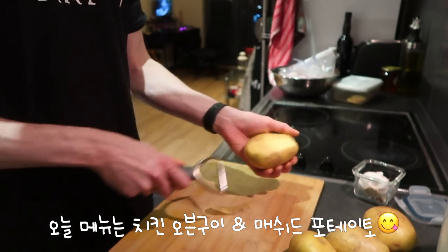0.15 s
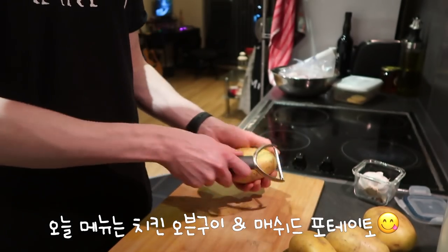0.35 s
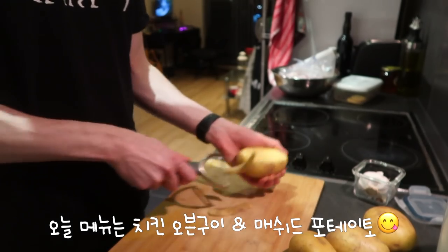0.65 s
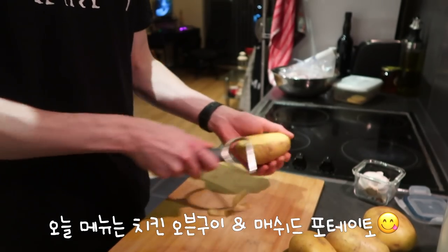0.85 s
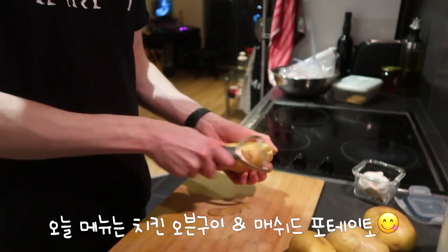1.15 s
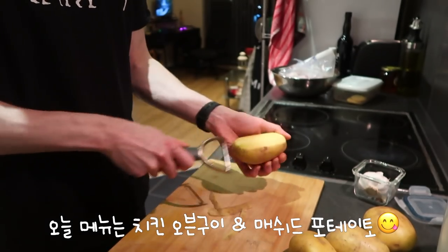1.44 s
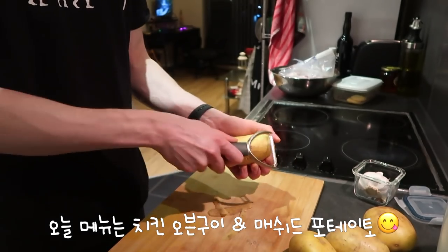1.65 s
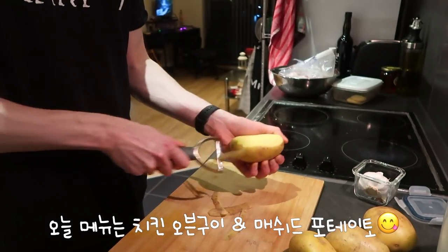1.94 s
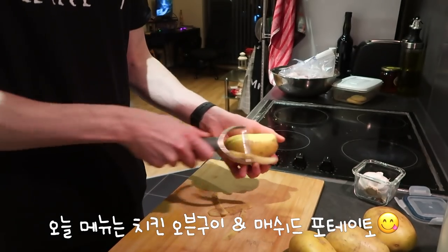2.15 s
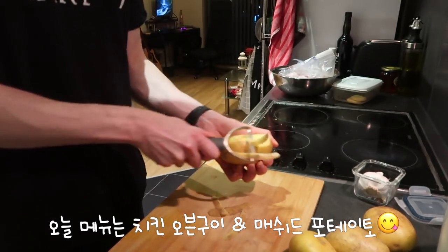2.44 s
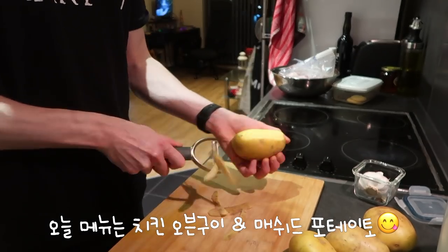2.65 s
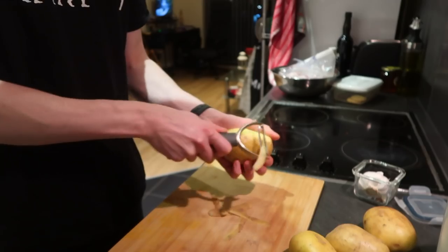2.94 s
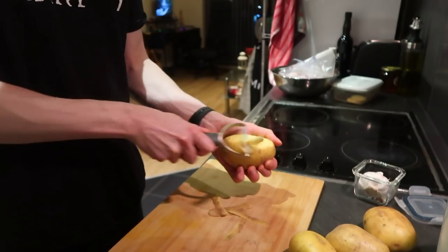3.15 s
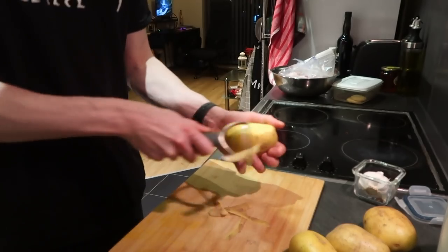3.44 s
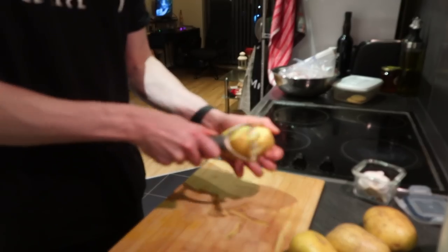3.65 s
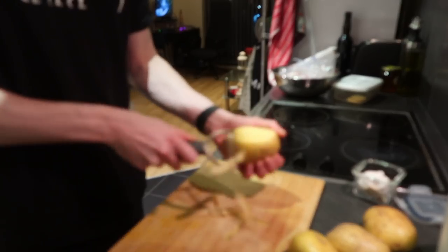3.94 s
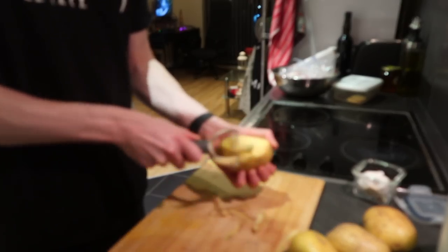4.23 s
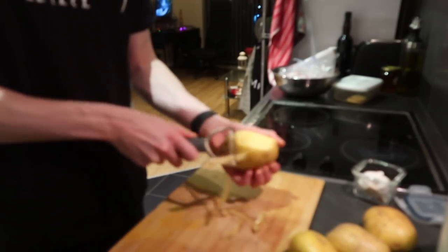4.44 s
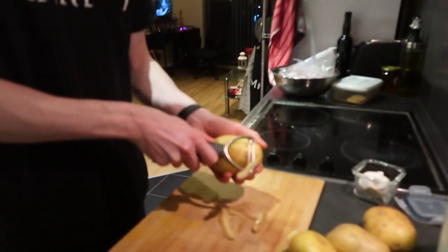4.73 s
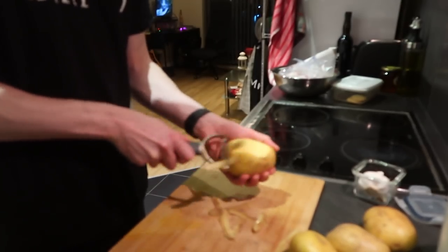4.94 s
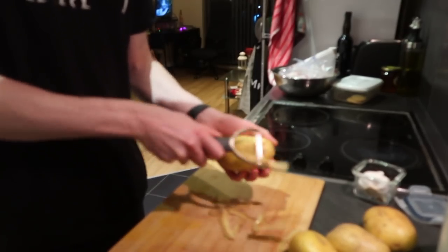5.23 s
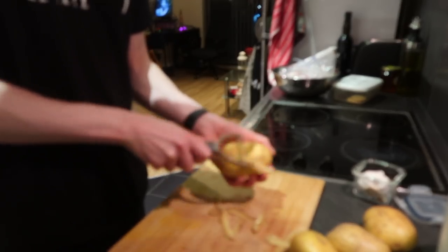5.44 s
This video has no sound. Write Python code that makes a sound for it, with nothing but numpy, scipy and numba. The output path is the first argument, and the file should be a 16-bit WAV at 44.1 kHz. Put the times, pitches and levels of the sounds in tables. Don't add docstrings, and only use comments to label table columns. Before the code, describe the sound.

Close wet scraping of a loose-bladed peeler, about two strokes a second, with one loud dull knock elsewhere and a steady fan rumble.

```python
import sys
import numpy as np
from scipy import signal
from scipy.fft import rfft, irfft, next_fast_len
from scipy.io import wavfile
from scipy.ndimage import uniform_filter1d
from numba import njit

SR = 44100
rng = np.random.default_rng(int(sys.argv[2]) if len(sys.argv) > 2 else 0)


def to_wav(sig):
    pcm = np.clip(np.atleast_2d(sig), -1, 1) * 32767
    pcm = np.round(pcm).astype(np.int16)
    wavfile.write(sys.argv[1], SR, pcm.T)


def invert_db(x):
    u = np.asarray(x, float) / 20
    return 10 ** u


N = 246116


def rms_one(x):
    return x / np.sqrt(np.mean(x ** 2) + 1e-20)


def at_hz(points, hz):
    table_hz, value = np.transpose(points)
    return np.interp(np.log(hz), np.log(table_hz), value)


def coloured(x, points):
    size = next_fast_len(x.shape[-1])
    hz = np.maximum(np.fft.rfftfreq(size, 1 / SR), 1)
    return irfft(rfft(x, size) * invert_db(at_hz(points, hz)), size)[..., :x.shape[-1]]


def band(x, low_hz, high_hz):
    sos = signal.butter(2, [low_hz, min(high_hz, .45 * SR)], "band", fs=SR, output="sos")
    return signal.sosfilt(sos, x)


def drift(rate_hz):
    knots = rng.standard_normal(int(N / SR * 200) + 2)
    return np.interp(np.arange(N) / SR * min(rate_hz, 199), np.arange(len(knots)), knots)


def ring(x, hz, t60_s):
    r = invert_db(-60 / (t60_s * SR))
    w = 2 * np.pi * hz / SR
    return signal.lfilter([0, np.sin(w)], [1, -2 * r * np.cos(w), r * r], x + 1e-18)


def rattle(start_s, lasts_s, modes):
    since_s = np.arange(N) / SR - start_s
    shake = (since_s > .004) * np.exp(-np.maximum(since_s, 0) / lasts_s)
    push = rng.standard_normal((2, N)) * shake
    return sum(invert_db(db - 56) * ring(push, hz, min(t60_s / 2, .4)) for hz, db, t60_s in modes)


@njit
def moving_resonance(x, hz, r, sr):
    out = np.zeros_like(x)
    for c in range(x.shape[0]):
        for i in range(2, x.shape[1]):
            feedback = 2 * r * np.cos(2 * np.pi * hz[i] / sr) * out[c, i - 1]
            out[c, i] = x[c, i] + feedback - r * r * out[c, i - 2]
    return out


def dying_noise(colour, rise_ms, hold_ms, scale, crack_db):
    # freq_hz, t60_s
    room_t60 = [(200, 0.84), (500, 0.66), (800, 0.44), (1250, 0.67), (2000, 0.73), (3300, 0.49),
                (5500, 0.64), (11000, 0.33)]
    t = np.arange(int(1.05 * SR)) / SR
    out = 0
    noise = rms_one(coloured(rng.standard_normal((2, len(t))), colour))
    edges_hz = 125 * 2 ** np.arange(0, 7.1, .4)
    for k, (low, high) in enumerate(zip(edges_hz, edges_hz[1:])):
        t60_s = scale * at_hz(room_t60, np.sqrt(low * high))
        direct = invert_db(crack_db) * np.exp(-t * low / 14)
        diffuse = invert_db(-60 * np.maximum(t - hold_ms / 1000, 0) / t60_s)
        out = out + (-1) ** k * band(noise, low, high) * (diffuse + direct)
    return out * np.minimum(t * 1000 / rise_ms, 1) ** 2


def fan():
    # freq_hz, density_db
    air_colour = [(15, -39), (25, -9.5), (32, -11), (40, -3.5), (88, 0.5), (121, -0.5), (154, -5.5),
                  (202, -11.5), (237, -21.5), (264, -16.5), (373, -14), (404, -16), (438, -16.5),
                  (475, -23.5), (1420, -32), (2500, -31.5), (8500, -50), (15000, -65.5)]
    # freq_hz, density_db
    side_colour = [(35, -65), (60, -41), (190, -8.5), (339, -4), (381, -6.5), (762, -13.5), (982, -14),
                   (4110, -19.5), (8820, -30), (10400, -27), (15000, -58)]
    # freq_hz, width_hz, level_db
    hums = [(154.2, 5.6, -42), (204.2, 9, -50), (271.3, 1.53, -52.5), (351, 15, -57.5), (1820, 160, -62.5),
            (2050, 110, -64)]
    air_db, side_db, hum_waver_db = -38, -55.5, 3.5
    air = invert_db(air_db) * rms_one(coloured(rng.standard_normal(N), air_colour))
    for hz, width_hz, db in hums:
        level = invert_db(db + hum_waver_db * drift(4.1) * np.log10(hz / 100))
        t60_s = np.log(1000) / np.pi / width_hz
        air += level * rms_one(ring(rng.standard_normal(N), hz, t60_s))
    side = invert_db(side_db) * rms_one(coloured(rng.standard_normal(N), side_colour))
    return np.array([air, side])


def knocks():
    # start_s, level_db, hold_ms, decay_scale, crack_db
    blows = [
        (0.581, -27.5, 3, 0.6, 4),
        (1.978, -39, 45, 0.91, -6),
        (2.342, -7.5, 47, 0.95, -6),
        (2.888, -46, 20, 0.99, 3),
        (3.239, -40.5, 21, 0.27, -10),
        (4.584, -27.5, 31, 1.14, -35),
    ]
    # freq_hz, density_db
    colours = [
        [(150, -31), (300, -9.5), (432, 4), (560, -12), (690, -0.5), (900, -8), (1090, 5), (1300, -5),
         (2300, -3), (3600, -9), (5200, -61)],
        [(240, -39), (400, -3.5), (549, -23), (672, 3.5), (774, -6), (2000, -11), (2600, -43), (4400, -120)],
        [(90, -49), (170, -15.5), (250, -25), (300, -19), (340, -16), (615, -9.5), (680, -8), (1010, -0.5),
         (1350, -4), (2100, -6), (2800, -14), (3600, -22.5), (7300, -44.5), (15000, -70)],
        [(290, -38), (500, -13), (941, -2), (1500, -14), (2000, -1.5), (2600, -36), (4400, -120)],
        [(240, -44), (400, -11), (638, -4), (980, -18), (1490, -6.5), (1700, -4), (2210, -33), (3740, -120)],
        [(240, -45), (400, -19), (520, -15.5), (620, -13.5), (995, -2), (1360, -4.5), (1680, -13.5),
         (2180, -17.5), (2800, -25), (3480, -19), (4200, -20), (9000, -35.5), (15000, -53)],
    ]
    # freq_hz, level_db, t60_s
    board = [(450, 12, .2), (704, 4, .15), (780, 2, 0.17), (1120, 6, 0.19), (1500, 7, .1), (2370, 3, .06)]
    panel = [(295.6, 7.5, 0.55), (684, 5, 0.33), (970, -5, 0.28), (995, 6.5, 0.43), (1084, -3, 0.23),
             (1350, 10, 1), (1610, -5, .4), (2100, 5.5, .5), (1940, -5, 0.48)]
    hollow = [(1140, -25, 0.16), (1232, -17, 0.16), (1385, -23, .12), (3250, -19, 0.043),
              (3480, -15.5, 0.08)]
    rise_per_hold, longest_rise_ms = 0.21, 8.9
    out = np.zeros((2, N))
    for (s, db, hold_ms, *decay), colour in zip(blows, colours):
        blow = dying_noise(colour, min(rise_per_hold * hold_ms, longest_rise_ms), hold_ms, *decay)
        at = round(s * SR)
        out[:, at:at + blow.shape[1]] += invert_db(db) * blow[:, :N - at]
    out = out + rattle(blows[2][0], 0.11, panel) + rattle(blows[0][0], 0.028, board)
    return out + invert_db(14) * rattle(blows[5][0], 0.14, hollow)


def kitchen(x):
    tail = dying_noise([(100, -10.0), (10000, 2.0)], rise_ms=7.3, hold_ms=0, scale=0.37, crack_db=2)
    return signal.fftconvolve(x, tail / np.sqrt(np.sum(tail[0] ** 2)), axes=1)[:, :N]


def squeaks():
    # start_s, length_s, pitch_hz, level_db
    slips = [
        (0.142, 0.075, 910, -15),
        (1.414, 0.11, 1522, -13.5),
        (2.757, 0.065, 780, -12),
        (3.25, 0.045, 1500, -10),
        (3.66, 0.027, 700, -7),
        (3.895, 0.17, 1550, -12.5),
        (3.97, 0.1, 2050, -14.5),
    ]
    t60_s = 0.26
    return sum(rattle(s, length_s, [(hz, db, t60_s)]) for s, length_s, hz, db in slips)


def taps():
    # freq_hz, level_db, t60_s
    blade_modes = [(1330, -2.5, 0.0062), (2130, -1, 0.036), (2440, -5, 0.028), (2944, 5, 0.007),
                   (3340, -4, 0.024), (4210, 3, 0.0045)]
    edge_modes = [(5110, 1.5, 0.0094), (4980, -4, 0.009), (5680, -1.5, 0.0022), (7220, -6.5, 0.0056),
                  (8420, -18.5, 0.024), (9500, -18, 0.0083), (11600, -20, 0.0071)]
    # start_s, peak_db, ring_hz, bright_db, low_db
    landings = [(0.4757, -7.5, 3295, -14.5, -6.5), (1.093, -24, 4400, -9, -11),
                (1.1015, -21.5, 2900, -18, -20), (1.738, -16.5, 3200, -18, -30),
                (1.7456, -20, 2050, -11, -32), (3.0857, -13, 3680, -12, -9), (3.0965, -25, 3250, -4, -25),
                (3.6335, -22.5, 2020, -10, -9), (3.6588, -18.5, 2760, -17, -10),
                (4.1703, -14.5, 2200, -9, -46), (4.804, -8, 3090, -13.5, -16),
                (5.358, -16.5, 2780, -22, -38.5)]
    bounces = [
        (0.4857, -20, 2780, -12, -23),
        (1.062, -26.5, 3170, -15, -2),
        (4.0968, -27, 2300, -18, -26),
        (4.8149, -19.5, 2130, -10, -16),
        (5.3662, -18, 3100, -5.5, -14),
    ]
    ticks = [(0.0845, -26, 3680, -5.5, -14), (0.156, -39, 2440, -10, -12), (0.7186, -27, 3260, -14, -18),
             (0.8035, -29.5, 2770, -28, -21.5), (1.397, -26.5, 2730, -35, -25),
             (1.4635, -31.5, 2270, -8, -20), (1.5265, -39, 2460, -23, -13), (2.0422, -27.5, 2770, -12, -18),
             (2.76, -31, 2770, -8, -2), (2.7894, -32, 2797, -18, -15), (2.8906, -24, 1900, -14, -5),
             (3.0716, -26.5, 2960, -18, -15), (3.6242, -30.5, 3480, -8, -17),
             (5.049, -28.5, 2740, -11, -17), (5.0837, -32, 2100, -10, -16), (5.3206, -33.5, 2000, -3, -10)]
    out = np.zeros((2, N))
    t = np.arange(2000) / SR
    groups = [(landings, 1.7), (bounces, 0.79), (ticks, 2.8)]
    contacts = [(*row, contact_ms) for rows, contact_ms in groups for row in rows]
    for s, db, ring_hz, bright_db, low_db, contact_ms in contacts:
        swell = t * 1000 / max(contact_ms, .1)
        chatter = rng.standard_normal((2, len(t))) * swell * np.exp(-swell)
        modes = blade_modes + [(hz, level + bright_db + 11.5, t60_s) for hz, level, t60_s in edge_modes]
        luck_db = rng.normal(0, 1.5, len(modes))
        body = np.zeros((2, len(t)))
        for k, (hz, level, t60_s) in enumerate(modes):
            body += (-1) ** k * invert_db(level + luck_db[k]) * ring(chatter, hz, min(t60_s, .014))
        body += invert_db(7) * ring(chatter, ring_hz, .011)
        body += invert_db(low_db + 30) * band(chatter, 700, 1600)
        body += invert_db(bright_db / 2 + 15) * band(chatter, 1800, 9000)
        at = round(s * SR) - 60
        out[:, at:at + len(t)] += (invert_db(db) * body / np.abs(body[0]).max())[:, :N - at]
    return out


def stroke_controls():
    # start_s, bite_s, length_s, hiss_db, swell_db
    strokes = [
        (-.12, .04, 0.13, -29, -1),
        (0.489, 0.016, 0.21, -33.5, -3),
        (1.137, 0.13, 0.24, -36.5, -3.5),
        (1.765, .06, 0.23, -35.5, -3),
        (2.338, 0.0067, 0.31, -40.5, 0.5),
        (3.077, 0.057, 0.23, -37.5, -3),
        (3.656, 0.062, 0.16, -33, -3.5),
        (4.179, 0.019, .19, -33.5, -6.5),
        (4.821, 0.072, .2, -38, 2),
        (5.395, 0.059, 0.168, -39, 3.5),
    ]
    # start_s, length_s, hiss_db, extra_edge_db, extra_flesh_db
    brushes = [
        (.09, 0.088, -51, 0, 7),
        (0.698, 0.13, -50.5, 3.5, 0.5),
        (1.44, 0.11, -54, -2, 1.5),
        (2.05, 0.044, -55.5, 2, -5.5),
        (2.71, 0.11, -55.5, 5, 8),
        (2.91, 0.086, -59, 4, 0),
        (3.89, .22, -57, -8, 8.5),
        (5.046, 0.041, -48, 3, -2),
    ]
    bite_db, lift_db, lift_s, tail_db_per_s = 17, 11, 0.029, 73
    brush_bite_s = 0.02
    t = np.arange(N) / SR
    rows = [(*row, 0, 0) for row in strokes]
    rows += [(s, brush_bite_s, length_s, db, 0, *extra) for s, length_s, db, *extra in brushes]
    s, bite_s, length_s, db, swell_db, edge_db, flesh_db = np.transpose(rows)[:, :, None]
    along = np.clip((t - s) / length_s, 0, 1)
    after_s = np.maximum(t - s - length_s, 0)
    fall = bite_db * np.maximum(1 - (t - s) / bite_s, 0)
    fall += lift_db * np.minimum(after_s / lift_s, 1) + tail_db_per_s * after_s
    level = db + swell_db * along - fall
    lead = level.argmax(axis=0)
    hiss_db = level.max(axis=0)
    fall_db = np.clip(db.max() - 1.5 - hiss_db, 0, 18)
    picked = [along[lead, np.arange(N)], edge_db[lead, 0], flesh_db[lead, 0]]
    return hiss_db, fall_db, *uniform_filter1d(picked, size=600)


def cutting():
    # freq_hz, density_db
    cut_colour = [(300, -49), (500, -16), (800, -19.5), (1390, -8), (1800, 0.5), (2500, -5.5), (3200, -2.5),
                  (3800, -8), (4600, -3.5), (6000, -9.5), (9000, -26), (12000, -19.5), (15500, -47)]
    hiss_db, fall_db, along, more_edge_db, more_flesh_db = stroke_controls()
    hiss_db = hiss_db + .9 * drift(25)
    edge_db = -12.5 + 0.43 * fall_db + 5.5 * along + more_edge_db
    edge_db = edge_db + 1 * np.exp(-along / 0.15)
    flesh_db = -15 + 0.65 * fall_db + 1.5 * along + more_flesh_db
    blade_hz = np.interp(along, [0, 1], (2520, 2300)) * (1 + .045 * drift(18))
    edge_hz = np.interp(along, [0, 1], (4090, 5390)) * (1 + .045 * drift(18))

    grains = rng.standard_normal((2, N)) * invert_db(1.3 * rng.exponential(1, N) + .8 * drift(120))
    even = coloured(grains, cut_colour)
    bands_hz = 500 * 2 ** np.arange(0, 5.1, 1 / 3)
    torn = np.zeros((2, N))
    for k, (low, high) in enumerate(zip(bands_hz, bands_hz[1:])):
        torn += (-1) ** k * band(even, low, high) * invert_db(2 * drift(45))

    flutter = invert_db(3.2 * np.array([drift(35), drift(35)]))
    flexing = moving_resonance(band(grains, 1500, 4500), blade_hz, np.exp(-np.pi * 160 / SR), SR)
    upper = moving_resonance(band(grains, 2030, 4500), 1.29 * blade_hz, np.exp(-np.pi * 260 / SR), SR)
    upper = invert_db(-7) * rms_one(upper)
    singing = moving_resonance(band(grains, 3500, 7000), edge_hz, np.exp(-np.pi * 230 / SR), SR)
    singing = rms_one(singing) * flutter[1] * invert_db(-0.52 * fall_db)

    blade = rms_one(band(torn, 1750, 3700)) + .9 * rms_one(flexing) * flutter[0] - upper * flutter[1]
    edge = rms_one(rms_one(band(torn, 3700, 15500)) + singing)
    flesh = rms_one(band(torn, 650, 1350))
    return invert_db(hiss_db) * (rms_one(blade) - edge * invert_db(edge_db) - flesh * invert_db(flesh_db))


def scene():
    # freq_hz, gain_db
    mid_pickup = [(7000, -2), (9000, -0.5), (10800, -11.5), (12300, -5), (15000, -1)]
    side_pickup = [(60, -45), (110, -50), (200, -34), (380, -26), (700, -22.5), (1290, -19), (2380, -20),
                   (4400, -8), (8000, 5), (15000, 5)]
    hits = taps()
    mid, side = cutting() + hits + invert_db(-6.5) * kitchen(hits) + knocks() + squeaks()
    mid, side = np.array([coloured(mid, mid_pickup), coloured(side, side_pickup)]) + fan()
    return np.array([mid + side, mid - side])


def band_limit(x):
    return signal.sosfilt(signal.butter(12, 15950, fs=SR, output="sos"), x)


def record(dry):
    t = np.arange(N) / SR
    level_db = 10 * np.log10(uniform_filter1d(np.mean(dry, axis=0) ** 2, size=400) + 1e-12)
    over_db = np.maximum(level_db + 18.0, 0) * 0.5
    held_db = np.maximum.accumulate(over_db + 8 * t) - 8 * t
    r = np.exp(-1 / (0.015 * SR))
    ducked = dry * invert_db(-signal.lfilter([1 - r], [1, -r], held_db))
    ducked = .95 * np.tanh(ducked / .95)
    ducked = signal.sosfilt(signal.cheby2(12, 50, 15700, fs=SR, output="sos"), ducked)
    return band_limit(ducked)


dry = scene()
out = record(dry)
to_wav(out)
```